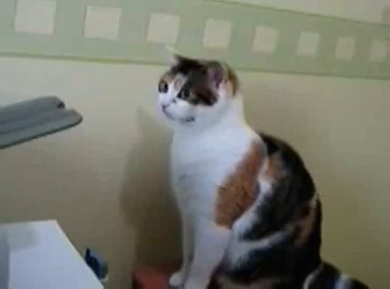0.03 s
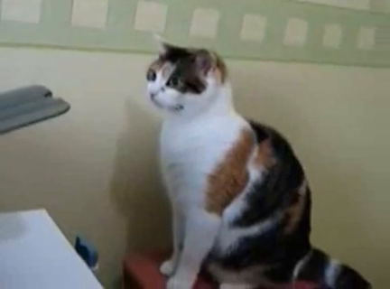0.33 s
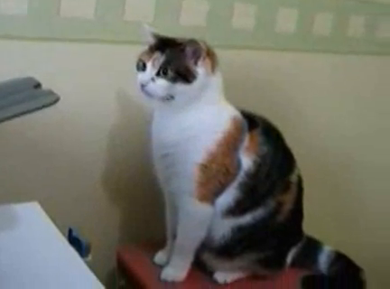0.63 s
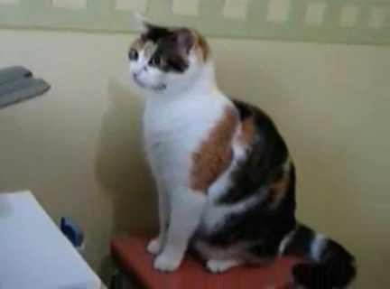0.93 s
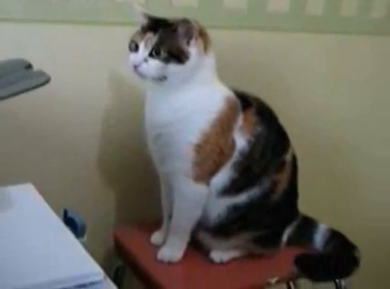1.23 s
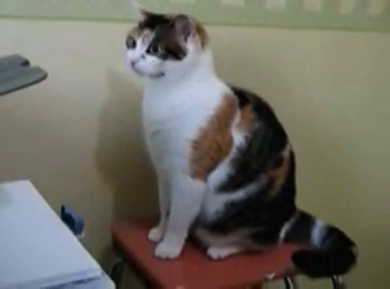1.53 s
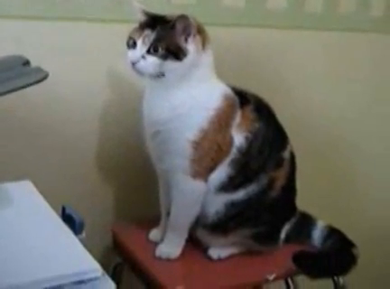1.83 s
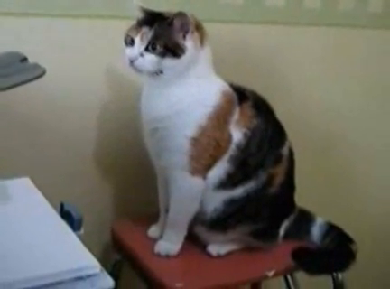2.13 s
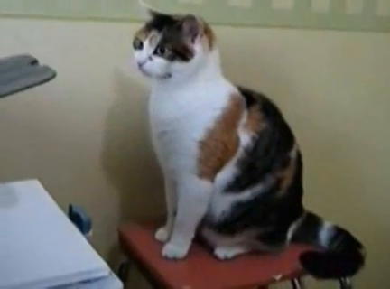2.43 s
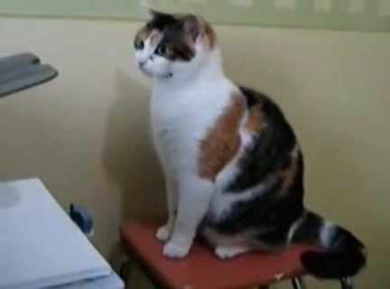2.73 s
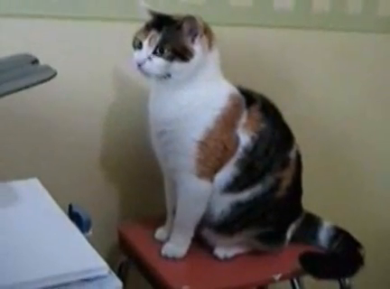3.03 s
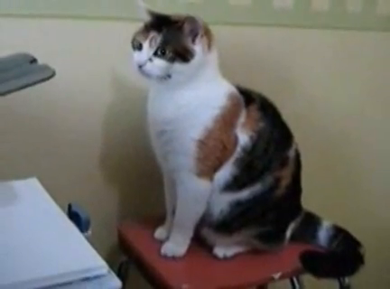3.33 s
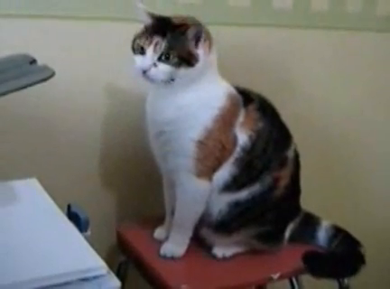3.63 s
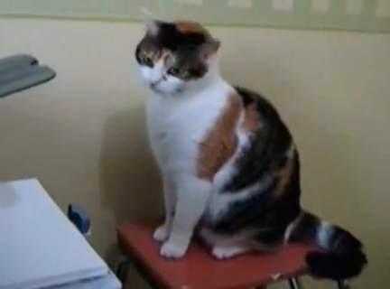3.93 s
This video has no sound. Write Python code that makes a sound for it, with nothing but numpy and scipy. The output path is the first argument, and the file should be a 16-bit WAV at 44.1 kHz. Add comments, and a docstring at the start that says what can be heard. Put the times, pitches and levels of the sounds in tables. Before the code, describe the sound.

A printer's motor runs steadily until a sharp clunk, leaving a faint fan hiss.

```python
"""A printer runs in a small quiet room: its drive motor hums at the stepping rate and its gears whir
with every turn, over a cooling fan and a thin electrical whine. Early on, a faint second motor starts
to coast down, its tones sliding through the resonances of the casing. At about 1.4 s the drive stops
and a latch shuts with a sharp, ringing clunk. The fan, the whine and the hiss remain."""
import sys
import numpy as np
from scipy import signal
from scipy.fft import rfft, irfft, next_fast_len
from scipy.io import wavfile
from scipy.ndimage import uniform_filter1d, map_coordinates

SR = 44100
rng = np.random.default_rng(int(sys.argv[2]) if len(sys.argv) > 2 else 0)


def dump(signal):
    """Clip the signal to [-1, 1] and save it as 16-bit WAV at the path in sys.argv[1]."""
    limited = np.clip(np.atleast_2d(signal).T, -1, 1)
    pcm = np.round(limited * 32767).astype(np.int16)
    wavfile.write(sys.argv[1], SR, pcm)


N = 176400

TURN_HZ, STEPS_PER_TURN = 21.0, 24
STOP_S, GEAR_T60_S, HUM_T60_S = 1.374, 0.23, 0.41


def amp(db):
    return 10 ** (np.asarray(db) / 20)


def unit(x):
    return x / np.sqrt(np.mean(x ** 2) + 1e-20)


def along(points, hz):
    """Read (Hz, value) points along a log frequency axis."""
    f, v = np.transpose(points)
    return np.interp(np.log(hz + 1), np.log(f + 1), v)


def clock():
    return np.arange(N) / SR


def curve(rows):
    """An envelope from breakpoints: seconds in the first column, value in the last."""
    columns = np.transpose(rows)
    return np.interp(clock(), columns[0], columns[-1])


def wobble(rate):
    """A smooth random modulator with `rate` knots a second."""
    return map_coordinates(rng.standard_normal(N // 16), [clock() * rate], mode="wrap")


def filtered(x, response):
    """Equalise x with a gain that is a function of frequency."""
    size = next_fast_len(len(x) + SR // 4)
    return irfft(rfft(x, size) * response(np.fft.rfftfreq(size, 1 / SR)), size)[:len(x)]


def coloured(x, spectrum):
    """Shape x with (Hz, dB) points and bring it to rms 1."""
    return unit(filtered(x, lambda f: amp(along(spectrum, f))))


def resonance(f, centre, width):
    """A bell-shaped gain, 1 at its centre."""
    return 1 / (1 + (2 * (f - centre) / width) ** 2)


def narrow(hz, width, db):
    """A fuzzy tone: noise in one resonance."""
    return amp(db) * unit(filtered(rng.standard_normal(N), lambda f: resonance(f, hz, width)))


def running(t60, drop_db=2.5, drop_s=0.0055):
    """Full level until the drive stops; then a quick drop, and the rest dies away."""
    since = np.maximum(clock() - STOP_S, 0)
    return amp(-drop_db * np.minimum(since / drop_s, 1) - 60 * since / t60)


def drive(flutter_rate=70, jitter_turns=0.00035, hum_flutter_db=0.7, gear_flutter_db=1.6):
    """The stepping hum and the gear tones, all locked to one shaft, each fluttering in level."""
    # The hum's envelope. Each row: time in seconds, an unused pitch in Hz, level in dB.
    hum_levels = [(0.02, 502.3, -25), (0.034, 502.3, -23.5), (0.572, 502.3, -21.5), (0.598, 502.3, -23.5),
                  (1.158, 502.3, -24.5), (1.37, 502.3, -21)]
    # Tones of the drive and its gears. Each row: multiple of the turning rate, relative level in dB.
    orders = [ (9, -54), (37, -56), (41, -56), (47, -53), (48, -37), (52, -53), (57, -55), (61, -57),
              (72, -56), (97, -55), (109, -54), (119, -55), (120, -57), (139, -54), (140, -55), (143, -58),
              (192, -48)]
    turns = TURN_HZ * clock() + jitter_turns * wobble(flutter_rate)
    tone = lambda k: np.sqrt(2) * np.sin(2 * np.pi * (k * turns + rng.random()))
    hum = amp(curve(hum_levels) + hum_flutter_db * wobble(flutter_rate)) * tone(STEPS_PER_TURN)
    gears = sum(amp(db + 0.5 + gear_flutter_db * wobble(flutter_rate)) * tone(k) for k, db in orders)
    return hum * running(HUM_T60_S) + gears * running(GEAR_T60_S)


def gear_whir(repeat_share=0.31, pulse_depth=0.094, grain_db=0.94):
    """Gear teeth rub: part repeats every turn, and all of it pulses with the steps. The housing drones."""
    # The colour of the gear train. Each row: frequency in Hz, relative level in dB.
    spectrum = [(30, -30), (110, -7.5), (180, 0), (260, -5.5), (400, -1), (560, 6), (720, -2), (1000, 1.5),
                (1350, -2), (1600, -4), (2900, -6), (3700, -11), (5500, -11.5), (8000, -20), (12500, -26.5)]
    # The whir's envelope. Each row: time in seconds, level in dB.
    whir_levels = [(0, -34.5), (.45, -34), (.7, -35), (1.25, -36), (1.37, -35)]
    # The swell of the housing's drone. Each row: time in seconds, relative level in dB.
    drone_levels = [(0, -43), (.22, -59), (.42, -42), (.5, -40), (.62, -43), (.7, -48.5), (1.37, -52)]
    looped = np.resize(rng.standard_normal(round(SR / TURN_HZ)), N)  # one turn of noise, over and over
    rub = np.sqrt(repeat_share) * looped + np.sqrt(1 - repeat_share) * rng.standard_normal(N)
    pulse = 1 + pulse_depth * np.sin(2 * np.pi * TURN_HZ * STEPS_PER_TURN * clock())
    grain = amp(grain_db * wobble(200))
    whir = amp(curve(whir_levels)) * coloured(rub * pulse * grain, spectrum)
    drone = narrow(hz=184.5, width=23, db=curve(drone_levels) - 1)
    return (whir + drone) * running(GEAR_T60_S)


def fan(rush_db=-44, patchy_db=0.96):
    """The cooling fan runs throughout: a slightly patchy rush of air, with fuzzy fan and mains tones."""
    # The colour of the rush and hiss. Each row: frequency in Hz, relative level in dB.
    spectrum = [(25, -15), (50, -7.5), (85, -10), (125, -3), (150, -6.5), (200, -5), (330, -4.5), (440, -7),
                (600, -3.5), (800, -7), (1500, -9), (3000, -12.5), (6500, -15.5), (8000, -19),
                (9000, -17.5), (12500, -20)]
    # Fan and mains tones. Each row: centre in Hz, width in Hz, level in dB.
    tones = [(119.6, 13, -62), (181.3, 14, -64), (470, 12, -63), (529, 18, -65.5), (599, 7.5, -58.5),
             (720, 9.7, -62.5)]
    bands = signal.stft(rng.standard_normal(N), nperseg=512)[2]
    patches = uniform_filter1d(rng.standard_normal(bands.shape), 8, axis=0)  # smooth across frequency
    patches = uniform_filter1d(patches, 12, axis=1)  # and across time
    air = signal.istft(bands * amp(patchy_db * unit(patches)), nperseg=512)[1][:N]
    return amp(rush_db) * coloured(air, spectrum) + sum(narrow(*row) for row in tones)


def electrical_whine():
    """The electronics whine throughout: thin high tones and two wider bands of hiss."""
    # The bands of the whine. Each row: centre in Hz, width in Hz, level in dB.
    bands = [(7559, 5, -66), (7855, 5, -70), (7881, 5, -69), (7750, 450, -65), (10850, 300, -70)]
    return sum(narrow(*row) for row in bands)


def room(x):
    """The small room's reverb, wet only, after a 5 ms pre-delay; the highs die first."""
    # The room's decay. Each row: frequency in Hz, seconds to fall by 60 dB.
    decay = [(200, 0.52), (1000, 0.35), (4000, .24), (11000, 0.2)]
    hz, t, bands = signal.stft(rng.standard_normal(SR // 2), SR, nperseg=256)
    tail = signal.istft(bands * amp(-60 * t / along(decay, hz)[:, None]), SR, nperseg=256)[1]
    return signal.fftconvolve(x, np.pad(tail, (SR // 200, 0)) / np.linalg.norm(tail))[:N]


def coasting_motor(coast_s=0.37, from_hz=505, fall_hz_per_s=465, floor_db=-12, wet_db=-4):
    """A second motor holds its pitch, then friction slows it evenly; tones swell at casing resonances."""
    # The motor's tones. Each row: multiple of its pitch, level in dB ahead of the casing.
    orders = [(2, -44), (3, -46), (4, -48), (12, -48)]
    # Resonances of the casing. Each row: centre in Hz, width in Hz, gain in dB.
    peaks = [(955, 80, 11), (1370, 140, 7), (2280, 120, 3), (3120, 200, 10), (4160, 240, 7), (4980, 180, 0)]
    since = np.maximum(clock() - coast_s, 0)
    hz = np.maximum(from_hz - fall_hz_per_s * since, 0)
    phase = 2 * np.pi * np.cumsum(hz) / SR
    casing = lambda f: amp(floor_db) + sum(amp(db) * resonance(f, mid, width) for mid, width, db in peaks)
    tones = sum(amp(db) * casing(k * hz) * np.sin(k * phase) for k, db in orders)
    tones *= np.sqrt(hz / from_hz)  # fades as it slows
    return tones + amp(wet_db) * room(tones)


def latch_clunk(crack_db=-3, crack_t60_s=0.029, wet_db=-5.5, ring_s=1.395, ring_db=-15.5, attack_s=0.0011):
    """The latch chatters shut in a few hard contacts and sets the housing ringing."""
    # The latch's contacts. Each row: start in seconds, relative level in dB, low-pass cutoff in Hz.
    contacts = [(1.3924, -21.5, 12000), (1.3939, -13.5, 12000), (1.3963, -10.5, 4000),
                (1.3998, -19.5, 3000), (1.403, -18.5, 2500), (1.411, -26, 1800), (1.431, -25.5, 1400)]
    # The colour of a contact's crack. Each row: frequency in Hz, relative level in dB.
    spectrum = [(100, -22), (300, -15), (580, -4), (760, -15.5), (1300, -0.5), (1580, -11.5), (1900, -5),
                (2450, -7), (3100, -1), (3900, -15), (4600, -4.5), (7000, -14.5), (10000, -6.5),
                (12500, -26)]
    # Latch and housing modes. Each row: frequency in Hz, relative level in dB, seconds to fall by 60 dB.
    modes = [(578.5, 0, 0.18), (1300, -9.5, 0.14), (1820, -18, .22), (1875, -20, 0.2), (2220, -7.5, .06),
             (2620, -17, 0.078), (3060, -7.5, 0.092), (4610, -15, 0.12), (5290, -25, .12),
             (6330, -11, 0.055), (7900, -21, 0.068), (9340, -28, .07), (10400, -24, 0.045)]
    cracks = np.zeros(N)
    for start, db, cutoff in contacts:
        age = clock() - start
        colour = lambda f: amp(along(spectrum, f)) / np.hypot(1, f / cutoff)
        noise = unit(filtered(rng.standard_normal(N), colour))
        cracks += amp(db + crack_db - 60 * np.abs(age) / crack_t60_s) * (age >= 0) * noise
    age = np.maximum(clock() - ring_s, 0)
    ring = sum(amp(db - 60 * age / t60) * np.sin(2 * np.pi * (hz * age + rng.random()))
               for hz, db, t60 in modes)
    attack = 1 - np.exp(-age / attack_s)
    return cracks + amp(wet_db) * room(cracks) + amp(ring_db) * attack * ring


def scene():
    """The moving parts over the steady bed of fan and whine, in mono."""
    return (drive() + gear_whir() + coasting_motor() + latch_clunk() + fan() + electrical_whine())[None]


def record(dry):
    """A brick-wall low-pass takes off the very top."""
    top_hz = 12580
    return np.array([filtered(x, lambda f: 1 / (1 + (f / top_hz) ** 260)) for x in dry])


dry = scene()
out = record(dry)
dump(out)
```